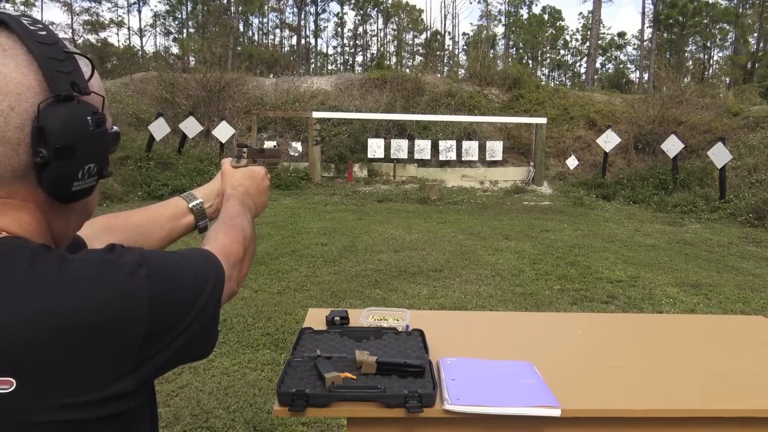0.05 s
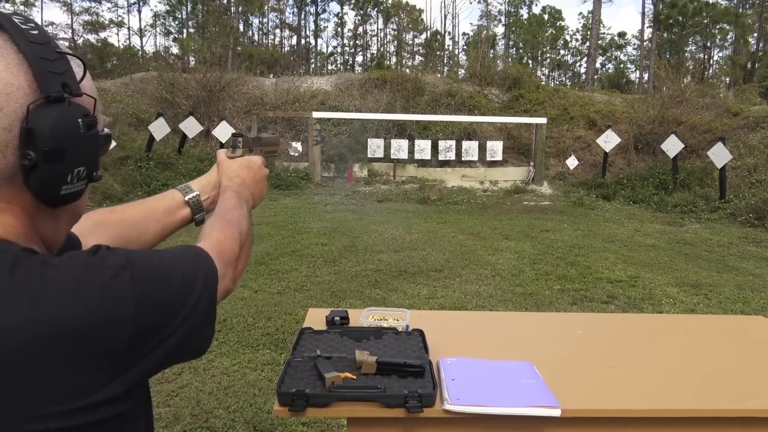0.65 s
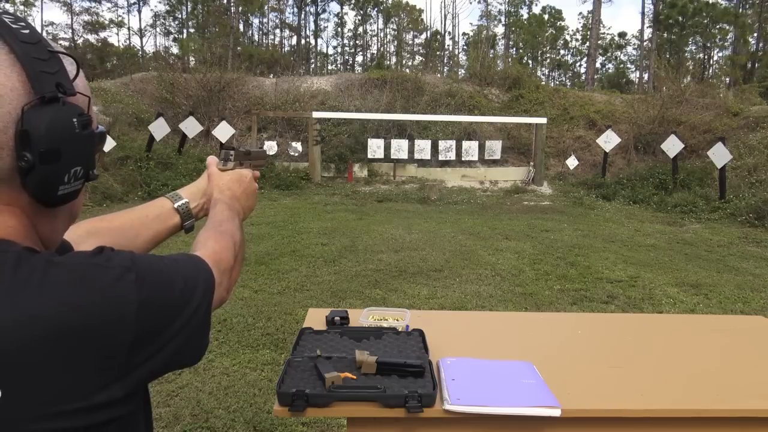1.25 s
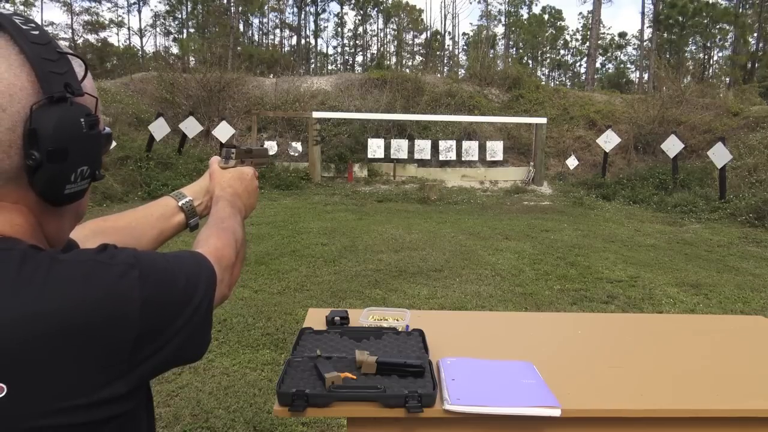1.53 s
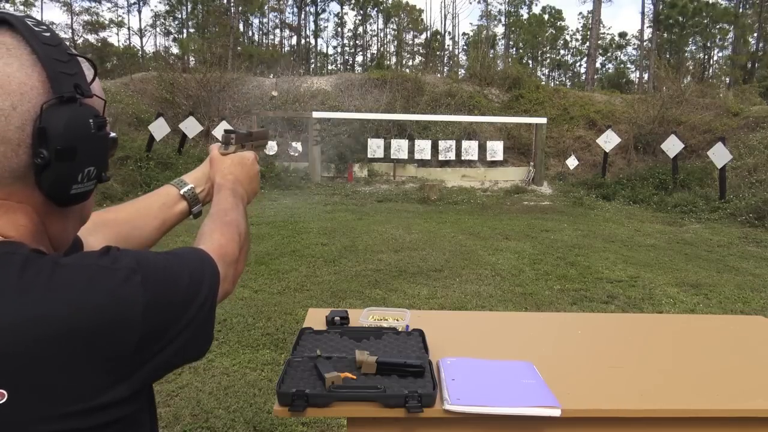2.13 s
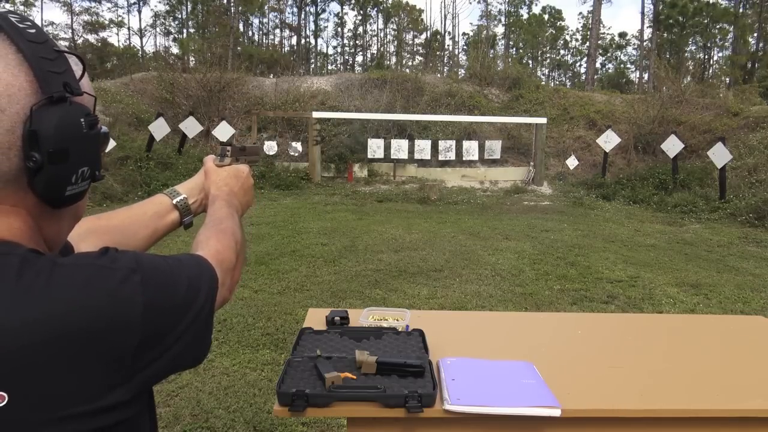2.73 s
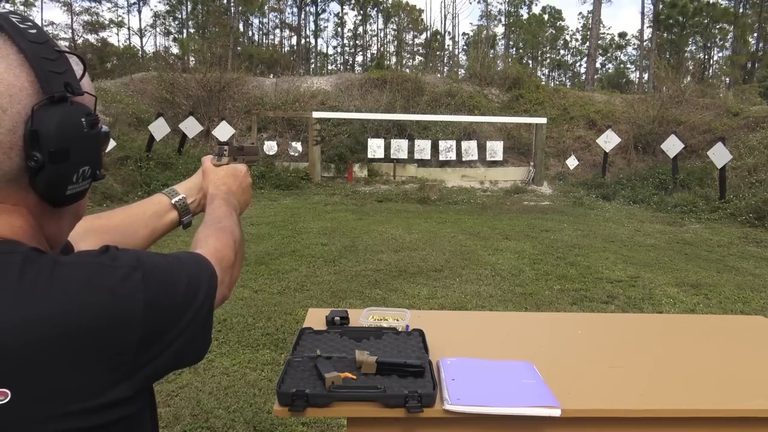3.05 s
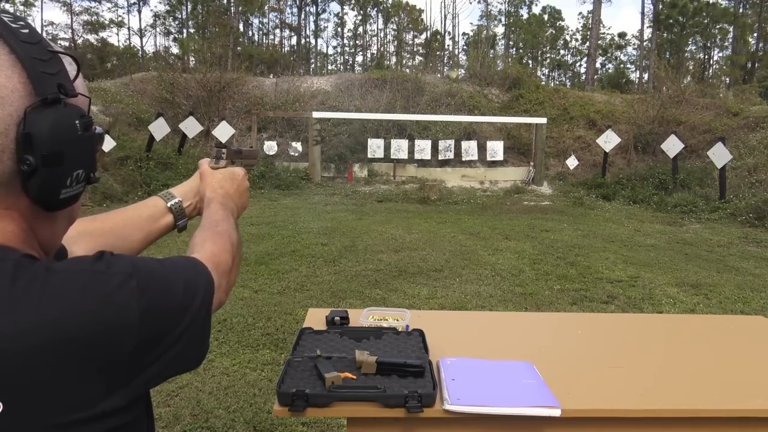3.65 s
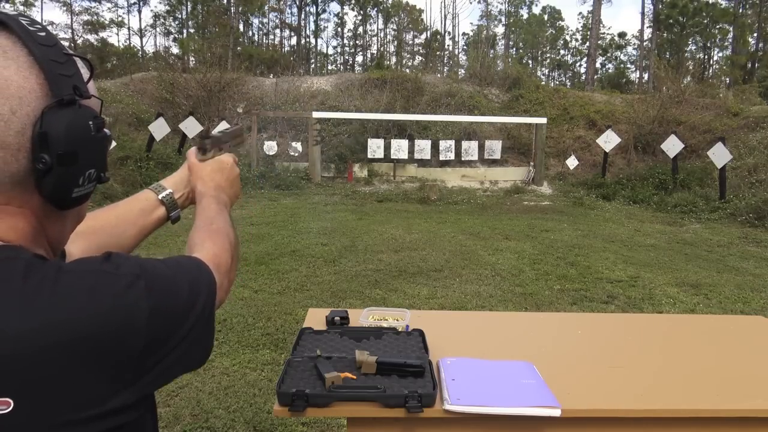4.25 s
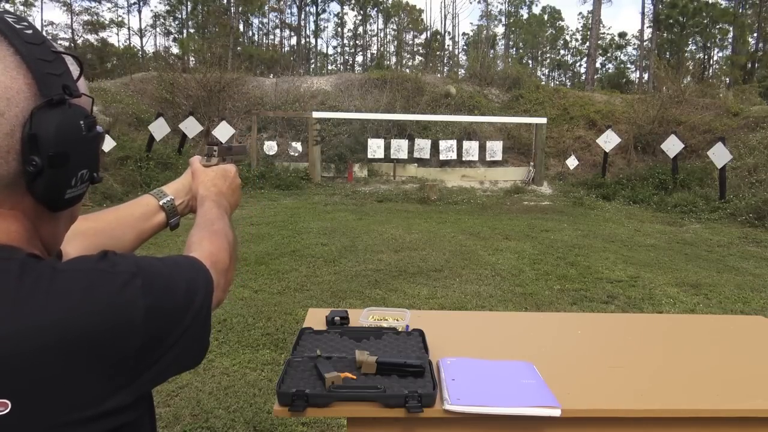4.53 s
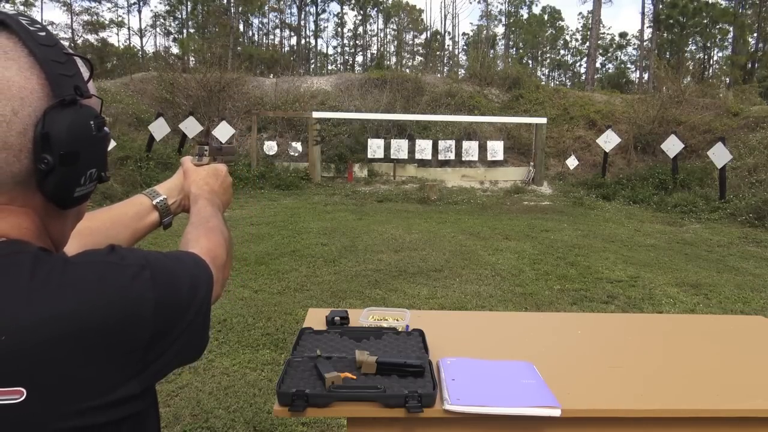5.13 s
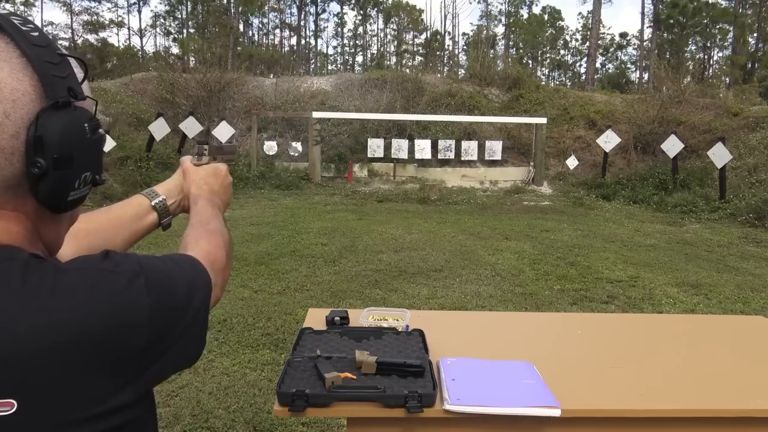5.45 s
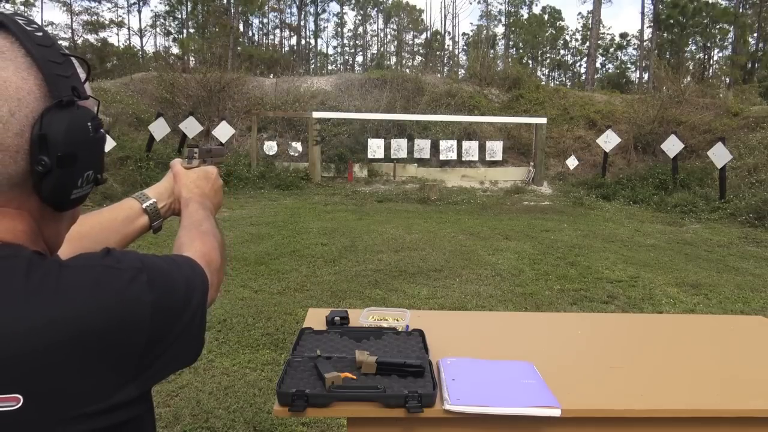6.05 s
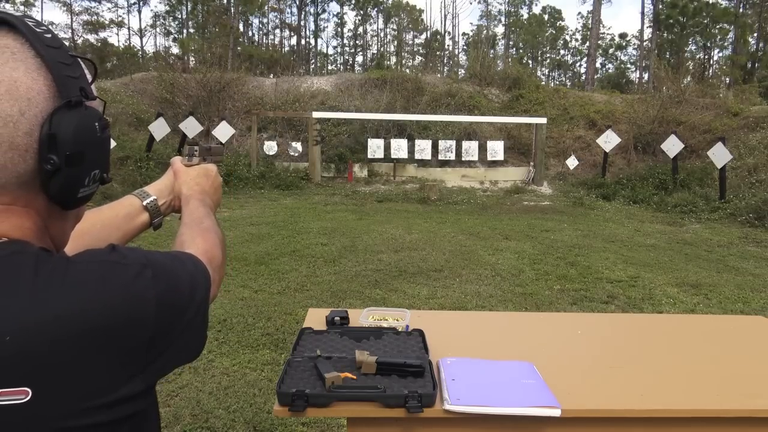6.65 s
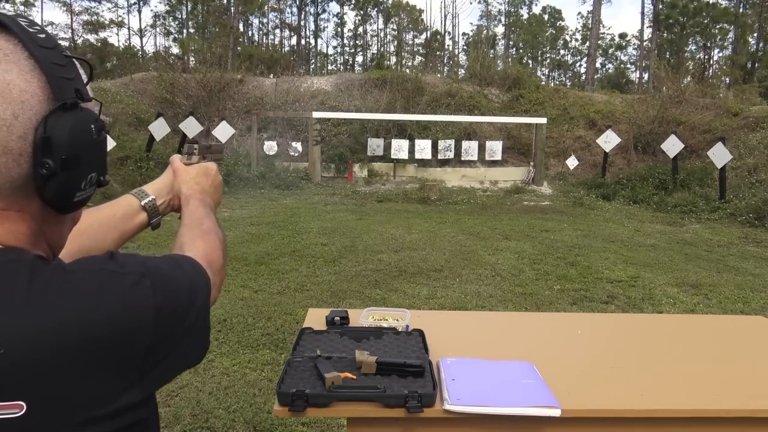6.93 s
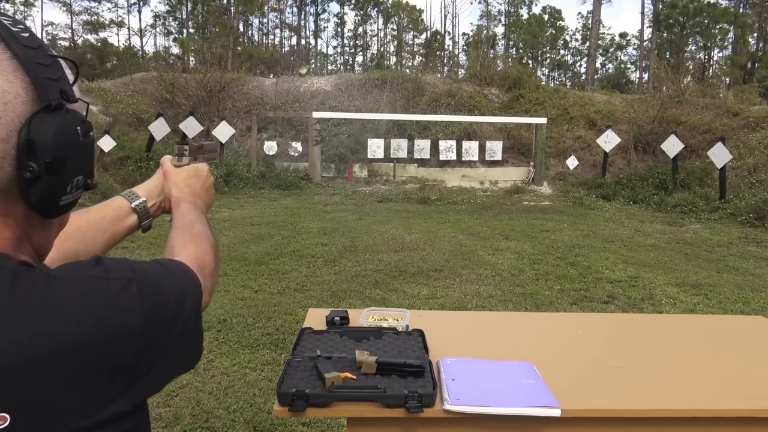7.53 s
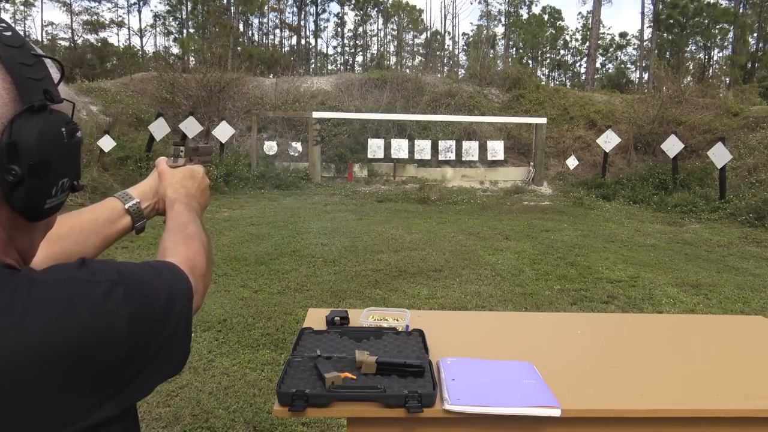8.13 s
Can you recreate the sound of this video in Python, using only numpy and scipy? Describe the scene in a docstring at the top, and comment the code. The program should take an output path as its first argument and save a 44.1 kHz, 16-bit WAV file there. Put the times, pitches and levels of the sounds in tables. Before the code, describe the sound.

A pistol fires eleven loud shots close to the microphone at an outdoor range. Each sharp crack and its hard slap echo distort and choke the sound for about a tenth of a second, then a roar from the surrounding woods rolls away over a second or two. Shots at about 0.6, 2.1, 3.4 and 4.2 seconds each set a steel plate ringing at a different pitch. A quick pair at 5.2 and 5.5 seconds strikes one plate twice. A faster run follows at 6.8, 7.1, 7.4, 7.8 and 8.3 seconds: the first and fourth clang on steel, while the others smack dully into earth. A spent brass case gives a high clink at 3.5 seconds, and another bounces faintly around 5.6. Trees hush softly underneath, and a light wind rumble rises on the microphone from about 6.2 seconds.

```python
"""Pistol shots on steel plates

Eleven shots at hanging plates on a grass range ringed by earth banks and pines; three miss.
Each blast and its hard slap echo overload a nearby microphone, deafening it for about a tenth
of a second; then the roar from the woods and the ringing plate break through.
Spent cases fly and land, and a breeze rises."""
import sys
import numpy as np
from scipy import signal
from scipy.fft import rfft, irfft, next_fast_len
from scipy.io import wavfile

SR = 44100
rng = np.random.default_rng(int(sys.argv[2]) if len(sys.argv) > 2 else 0)


def to_wav(s):
    """Save 16-bit WAV."""
    ch = np.atleast_2d(s).T  # columns
    pcm = np.round(np.clip(ch, -1, 1) * 32767)  # PCM
    wavfile.write(sys.argv[1], SR, pcm.astype(np.int16))


N = 369558
T = np.arange(N) / SR

# The shots: start_s, mic_deaf_s, roar_db, splash_db, plate_name (None for a miss)
SHOTS = [(.5530, 0.12, 1, -7.5, "a"), (2.0864, 0.12, 1, -10.5, "b"), (3.3884, 0.12, -1, -9.5, "c"),
         (4.2356, 0.12, -0.5, -5, "d"), (5.2468, 0.14, 0.5, -4, "e"), (5.523, 0.099, -1.5, -10, "e"),
         (6.7841, 0.12, -1.5, -6.5, "f"), (7.0624, 0.11, -2, -12.5, None), (7.3860, 0.12, -4.5, -9.5, None),
         (7.803, 0.11, -3.5, -7.5, "f"), (8.2540, 0.098, -7, -9.5, None)]
STRIKER_LEAD_S, SLAP_S = .003, .0621  # before and after the blast
BULLET_FLIGHT_S, CASE_FLIGHT_S = .07, .8


def undb(db):
    """Decibels to gain."""
    return 10 ** (np.asarray(db) / 20)


def fade(t, t60):
    """Exponential decay, 60 dB down after t60 seconds."""
    return np.exp(-np.log(1000) * t / t60)


def add(out, start_s, sound):
    """Mix a sound in at start_s."""
    start = int(start_s * SR)
    out[:, start:start + sound.shape[-1]] += sound[..., :N - start]


def white(n, side_db=-33):
    """White noise, almost mono, with a faint stereo width."""
    mid, side = rng.standard_normal((2, n))
    return mid + undb(side_db) * np.array([side, -side])


def noise(n, spectrum):
    """Noise of rms 1, coloured by (frequency_hz, level_db) points."""
    size = next_fast_len(n)
    hz, db = np.transpose(spectrum)
    colour = undb(np.interp(np.log(np.fft.rfftfreq(size, 1 / SR) + 1), np.log(hz), db))
    x = irfft(rfft(white(size)) * colour, size)[:, :n]
    return x / x.std()


def drift(n, rate_hz):
    """A glide between random values with a spread near 1."""
    return np.interp(T[:n] * rate_hz, np.arange(1024), rng.standard_normal(1024))


def breeze(calm_db=-55.5, breeze_db=-37, rise_at_s=6.2, rise_s=.39, buffet_db=4.5, hush_db=-54):
    """The trees hush softly; wind buffets the microphone, calm at first, then rising to stay."""
    # Colours of the tree hush and the wind rumble: frequency_hz, level_db
    hush_colour = [(25, -5.5), (120, -10), (250, -8), (500, -4.5), (1100, -17), (2000, -21.5),
                   (3200, -16.5), (5000, -28), (8000, -35), (15000, -45.5)]
    wind_colour = [(20, -2.5), (80, 0), (130, -4), (220, -26), (600, -60), (3000, -78.5)]
    hush = undb(hush_db + drift(N, .68)) * noise(N, hush_colour)
    wind_db = calm_db + (breeze_db - calm_db) * np.clip((T - rise_at_s) / rise_s, 0, 1)
    return hush + undb(wind_db + buffet_db * drift(N, 9.8)) * noise(N, wind_colour)


def muzzle_blast(striker_db=-21, blast_db=29, blast_length_s=.00259, bounce_db=20, bounce_at_s=.00673,
                 slap_db=20, slap_length_s=.005):
    """The striker clicks; the blast bursts out, bounces off the ground and slaps off a hard face."""
    # Colours of the blast and its slap echo: frequency_hz, level_db
    blast_colour = [(200, -29.5), (1000, 3.5), (1900, 1.5), (3200, 8), (4500, -1.5), (9000, -22.5),
                    (16000, -41)]
    slap_colour = [(200, -22), (900, -7), (2400, -4), (3400, -5.5), (5000, -27.5), (9000, -20),
                   (16000, -31.5)]
    n = int(.08 * SR)
    t = T[:n] - STRIKER_LEAD_S
    striker = undb(striker_db) * (t < 0) * np.exp(-abs(t) / .001) * noise(n, blast_colour)
    blast = undb(blast_db) * (t >= 0) * np.exp(-(t / blast_length_s) ** 8) * noise(n, blast_colour)
    bounce = undb(bounce_db) * np.exp(-((t - bounce_at_s) / .00006) ** 2)
    slap_envelope = (t >= SLAP_S) * np.exp(-((t - SLAP_S) / slap_length_s) ** 4)
    slap = undb(slap_db) * slap_envelope * noise(n, slap_colour)
    return striker + blast + bounce + slap


def flying_case(ring_db=-43, ring_hz=11800, detune=.07, t60=.69, tumble_hz=14, tumble_depth=.5):
    """The ejected case sings faintly as it tumbles through the air, until it lands."""
    t = T[:SR]
    tumble = 1 + tumble_depth * np.sin(2 * np.pi * (tumble_hz * t + rng.random()))
    pitch_hz = ring_hz * (1 + detune * rng.uniform(-1.2, 1))
    return undb(ring_db) * tumble * (t < CASE_FLIGHT_S) * brass_ring(pitch_hz, t60)


def brass_ring(pitch_hz, t60, scatter_db=4):
    """A case rings, its modes balanced a little differently at every knock."""
    # Modes of a brass case: pitch_ratio, level_db
    modes = [(.88, -21), (1, 3), (1.15, -16)]
    t, ring = T[:SR], 0
    for ratio, db in modes:
        ring += undb(db + scatter_db * rng.standard_normal()) * np.sin(2 * np.pi * pitch_hz * ratio * t)
    return fade(t, t60) * ring


def woods_roar(bank_smear_s=.014, echo_corner_hz=3000, flutter_db=4, flutter_hz=200, smoothing_s=.31):
    """Trunks and banks scatter the blast: the treble dies first, and the echoes return mostly lows."""
    # Colour and decay of the roar: frequency_hz, level_db, t60_s
    roar_bands = [(50, -64, 2.15), (146, -51.5, 1.52), (290, -51, 1.52), (513, -46, 2.29),
                  (960, -44.5, 1.923), (1940, -47.5, 1.806), (2890, -45.5, 1.775), (3196, -40.5, 1.56),
                  (3875, -50, 1.44), (4660, -52.5, 1.304), (6250, -57.5, 1.196), (10200, -63.5, 0.91),
                  (14700, -81.5, 1)]
    # Echoes off banks and tree lines: delay_s, level_db (relative to the roar)
    banks = [(0.134, 4), (0.18, 2.5), (0.226, -0.5), (0.272, -8), (.41, 3.5), (0.473, 0)]
    n = 2 * SR
    t, hz = T[:n], np.fft.rfftfreq(n, 1 / SR)
    roar_hz, roar_db, roar_t60 = np.transpose(roar_bands)
    echoes = sum(undb(db) * np.exp(-((t - delay_s) / bank_smear_s) ** 2) for delay_s, db in banks)
    echoes += trunk_echoes(t)
    colour = undb(np.interp(np.log(hz + 1), np.log(roar_hz), roar_db)) * np.sqrt(SR / 2)
    spectrum, roar = rfft(white(n)) * colour, 0
    edges_hz = np.geomspace(35, 17000, 33)
    for low, high in zip(edges_hz, edges_hz[1:]):
        centre_hz = np.sqrt(low * high)
        band = irfft(spectrum * (hz >= low) * (hz < high), n)
        decay = fade(t, np.interp(np.log(centre_hz), np.log(roar_hz), roar_t60))
        echo_lift = 1 + echoes / (1 + centre_hz / echo_corner_hz)
        flicker = undb(drift(n, 35.4))
        roar += band * decay * echo_lift * flicker
    # early echoes come one by one; late ones are dense and smooth
    flutter = undb(flutter_db * np.exp(-t / smoothing_s) * drift(n, flutter_hz))
    fade_in = np.clip(t / BULLET_FLIGHT_S - 1, 0, 1) ** .5
    return roar * flutter * fade_in


def trunk_echoes(t, count=26, echo_db=-3, spread_db=3, width_s=.0024, latest_s=.9):
    """Single trunks throw back short slaps from random distances: their gain over the roar."""
    delays_s = rng.uniform(BULLET_FLIGHT_S, latest_s, count)
    gains = undb(echo_db + spread_db * rng.uniform(-1.1, 1, count))
    return sum(gain * np.exp(-((t - delay_s) / width_s) ** 2) for delay_s, gain in zip(delays_s, gains))


def lead_splash(t60=.27, boost_db=9):
    """Bullet fragments spray off steel and sand."""
    # Colour of the spray: frequency_hz, level_db
    spray_colour = [(500, -32), (3000, 8.5), (6000, -6), (12000, -13), (16000, -25)]
    t = T[:SR // 2]
    return undb(boost_db) * fade(t, t60) * noise(len(t), spray_colour)


def steel_plate(name, earlier_hits, twin_gain=.7, in_phase_s=.19):
    """Steel rings in close, beating pairs of modes; where the bullet lands sets their levels."""
    # Modes by plate: pitch_hz, t60_s, beat_hz, first_hit_db, second_hit_db (if struck twice)
    plates = { "a": [(551, 2.1, .1, -6.5), (1090, 2.1, 0.27, -22.5), (1325, 3.3, 1.06, -13.5),
              (1476, 1.8, 1.5, -14.5), (1708, 1.4, .3, -17.5), (2130, 2.8, 0.27, -32)],
              "b": [(567, 1.22, .3, -15), (787, 2.6, 2.15, -10.5), (1334, .9, 0.65, -6),
              (1490, 1.34, .3, -16), (1738, 1.1, .3, -26.5), (2099, 1.11, 3, -5)],
              "c": [(1402, 1.0, 2.05, 3), (1626, 1.27, 1.9, -7), (2125, 1.66, .3, -25),
              (2680, 1.3, 0.27, -32), (3009, 1, 0.33, -16), (3488, .72, .3, -16), (5416, 1, .3, -27)],
              "d": [(567, 1.08, .3, -11.5), (1506, 1.65, 2.4, -14), (1724, 0.92, 0.36, -12)],
              "e": [(1377, 1.1, 0.43, -5, -15.5), (1620, 1, .3, -4, -18), (2164, 0.54, .3, -14, -25),
              (2670, .35, .3, -29, -4), (3467, 0.89, 0.321, -29, -20)], "f": [(581, 0.9, 1, -7.5, -6),
              (797, 1.9, 0.56, -14.5, -26), (1420, 0.53, .5, -14, -14), (1545, 0.67, 1, -30, -1.5),
              (1773, 0.73, 0.45, -19, -13), (2126, 1.24, .8, -9.5, -25), (3171, 0.47, .5, -16, -4),
              (4290, 0.56, 0.54, -36, -15), (5130, 0.45, .5, -13, -40), (6126, 0.82, .5, -20, -34),
              (8028, .5, .5, -14, -40), (9300, 0.22, .5, -18, -40)]}
    t, ring = T[:2 * SR], 0
    for pitch_hz, t60, beat_hz, *hit_db in plates[name]:
        phase = 2 * np.pi * (pitch_hz * t + rng.random())
        twin = twin_gain * np.sin(phase + 2 * np.pi * beat_hz * (t - in_phase_s))
        pair = (np.sin(phase) + twin) / (1 + twin_gain)
        ring += undb(hit_db[earlier_hits]) * fade(t, t60) * pair
    return ring


def case_tick(t60=.05):
    """A brass case touches the ground."""
    # Colour of the contact: frequency_hz, level_db
    tick_colour = [(1500, -14), (4000, 6.5), (8000, -7), (13000, -1), (16000, -5)]
    t = T[:SR // 2]
    return fade(t, t60) * noise(len(t), tick_colour)


def case_clink(ring_hz, contacts, t60=.15, tick_db=.5, detune=.09, hop_s=.035, hop_ratio=.95, loss_db=3):
    """A case hops on something hard, each hop shorter and weaker than the one before."""
    out, start_s = np.zeros((2, 2 * SR)), 0
    for k in range(contacts):
        gain = undb(-loss_db * k)
        add(out, start_s, gain * undb(tick_db) * case_tick())
        pitch_hz = ring_hz * (1 + detune * (k > 0) * rng.standard_normal())
        add(out, start_s, gain * brass_ring(pitch_hz, t60))
        start_s += hop_s * hop_ratio ** k
    return out


def earth_thud(level_db=-9.5, delay_s=.16, width_s=.051):
    """A bullet that misses smacks into the earth bank further off."""
    # Colour of a bullet in earth: frequency_hz, level_db
    earth_colour = [(150, -23), (600, -1), (1200, -2.5), (3200, -9), (5000, -15), (12000, -37)]
    t = T[:SR // 2]
    return undb(level_db) * np.exp(-((t - delay_s) / width_s) ** 2) * noise(len(t), earth_colour)


def scene(grass_tick_db=-52):
    """Over the breeze, every shot with its echoes, its hit or miss and its falling case."""
    # Cases that meet something hard: start_s, level_db, pitch_hz, contacts
    clinks = [(3.164, -50, 10900, 1), (3.506, -12, 12100, 1), (4.189, -42, 11020, 1),
              (5.645, -28.5, 12300, 5)]
    out, struck = breeze(), []
    for start_s, _, roar_db, splash_db, plate_name in SHOTS:
        impact_s, landing_s = start_s + BULLET_FLIGHT_S, start_s + CASE_FLIGHT_S
        add(out, start_s - STRIKER_LEAD_S, muzzle_blast())
        add(out, start_s, undb(roar_db) * woods_roar())
        add(out, impact_s, undb(splash_db) * lead_splash())
        if plate_name:
            add(out, impact_s, steel_plate(plate_name, struck.count(plate_name)))
            struck.append(plate_name)
        else:
            add(out, start_s, earth_thud())
        add(out, start_s, flying_case())
        if landing_s < T[-1]:
            add(out, landing_s, undb(grass_tick_db) * case_tick())
    for start_s, level_db, pitch_hz, contacts in clinks:
        add(out, start_s, undb(level_db) * case_clink(pitch_hz, contacts))
    return out


def record(dry, bias_depth=4.27, recover_s=.0098, duck_db=-6, duck_s=.23,
           blast_leak_s=.019, slap_leak_s=.061, coupling_hz=21, top_hz=15900):
    """Each blast pins the preamp to its rail: only the loudest peaks pass until its bias drifts back."""
    rail, slap_swing, slap_kick = .9, .72, .7
    bias, thump, duck, swing = np.zeros(N), np.zeros(N), np.zeros(N), np.ones(N)
    for start_s, deaf_s, *_ in SHOTS:
        age = np.maximum(T - start_s, 0)
        slap_age = np.maximum(age - SLAP_S, 0)
        release = (1 - np.tanh((age - deaf_s) / (2 * recover_s) + .5)) / 2
        pinned = np.minimum(age / .002, 1) * release
        bias += bias_depth * pinned
        # blast and slap each kick the output down, and the offset leaks away
        thump += rail * np.minimum(age / .0004, 1) * np.exp(-age / blast_leak_s)
        thump += slap_kick * np.minimum(slap_age / .0002, 1) * np.exp(-slap_age / slap_leak_s)
        # the slap finds the preamp still pinned, so it passes at a smaller swing
        swing -= (1 - slap_swing) * pinned * (age > SLAP_S / 2)
        # sensitivity returns more slowly than the bias
        duck = np.maximum(duck, (age > 0) * np.exp(-(age / duck_s) ** 4))
    biased = dry * undb(duck_db * duck) - bias
    overloaded = swing * (np.clip(biased, -rail, rail) + np.minimum(bias, rail)) - thump
    # the two channels' coupling capacitors are not quite alike
    highpasses = [signal.butter(1, coupling_hz * mismatch, "high", fs=SR) for mismatch in (.9, 1.1)]
    coupled = np.array([signal.lfilter(b, a, channel) for (b, a), channel in zip(highpasses, overloaded)])
    lowpass = signal.ellip(8, .2, 70, top_hz, fs=SR, output="sos")
    return signal.sosfilt(lowpass, np.clip(coupled, -1, 1))


dry = scene()
out = record(dry)
to_wav(out)
```